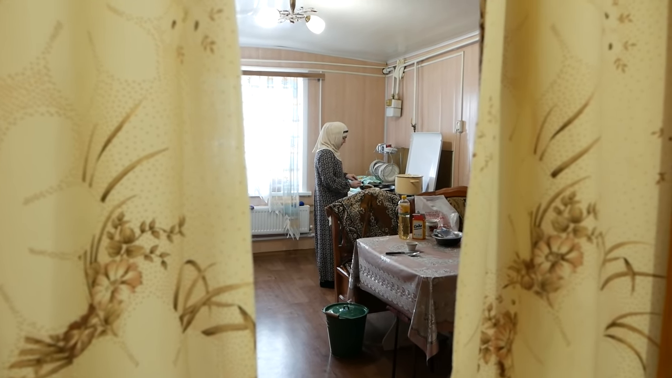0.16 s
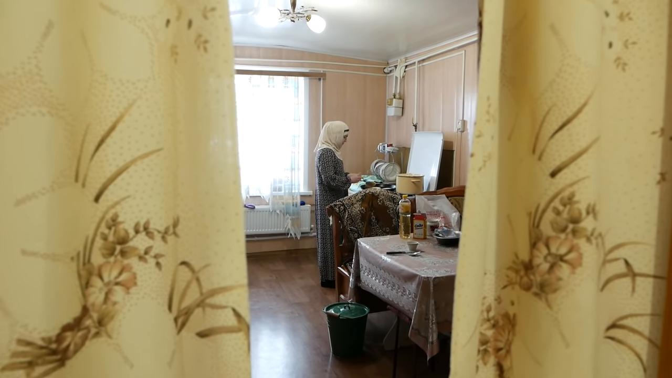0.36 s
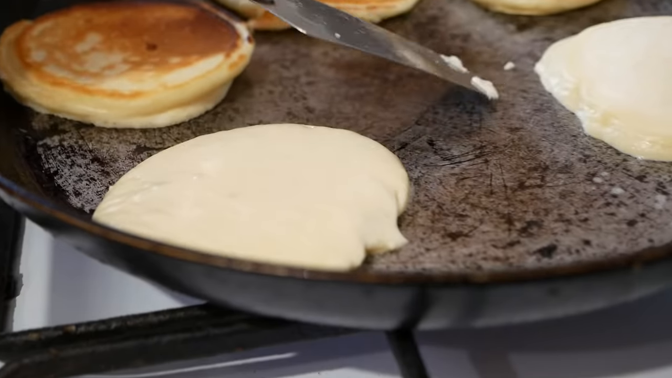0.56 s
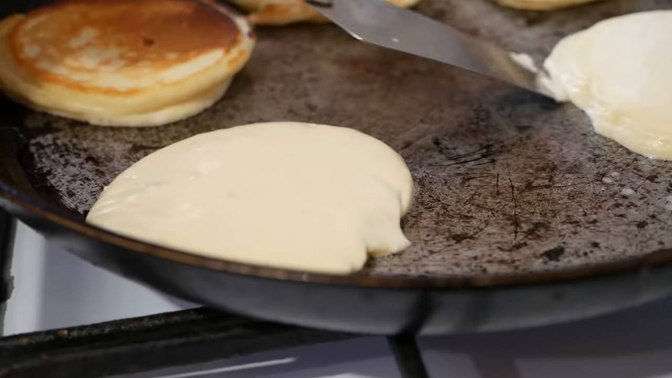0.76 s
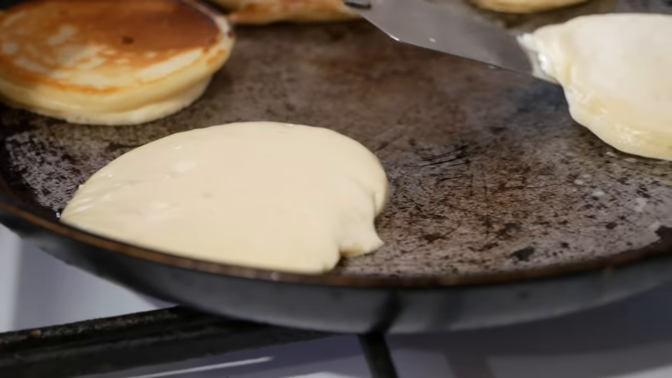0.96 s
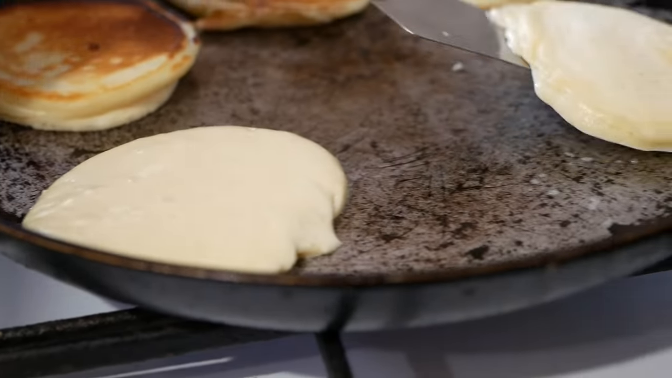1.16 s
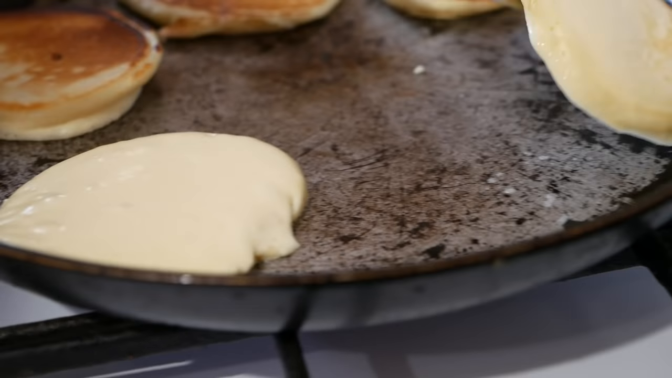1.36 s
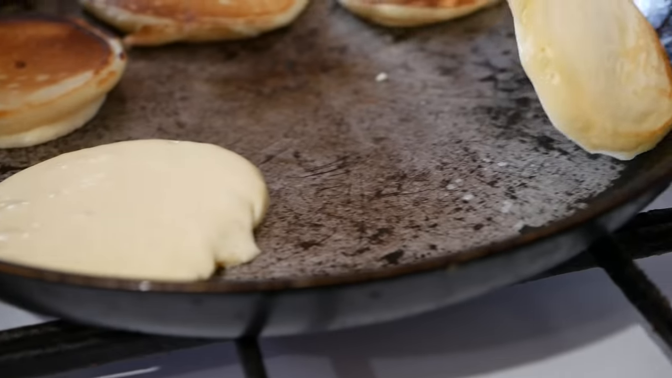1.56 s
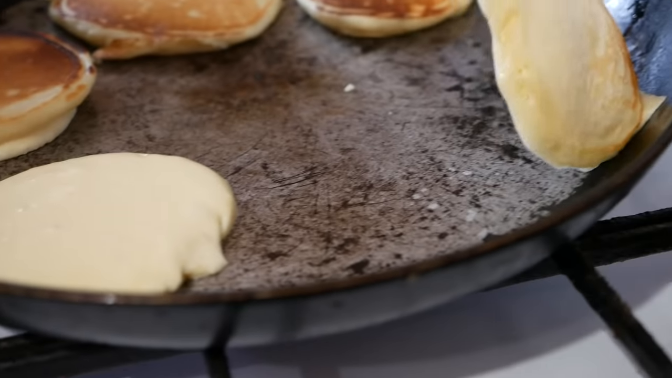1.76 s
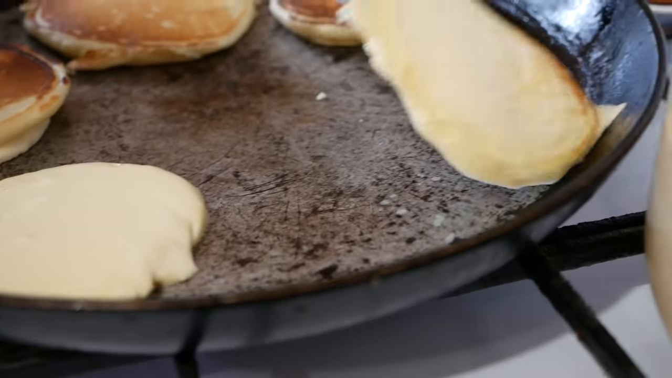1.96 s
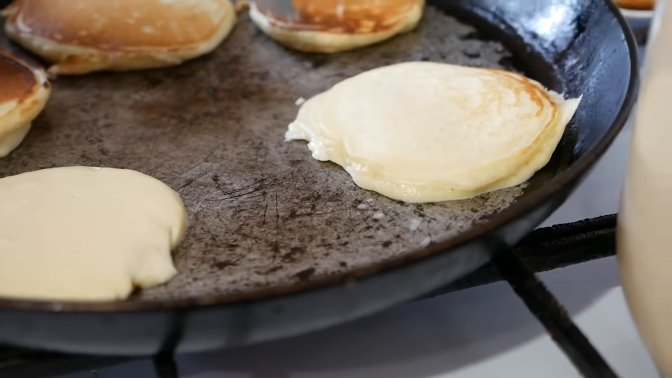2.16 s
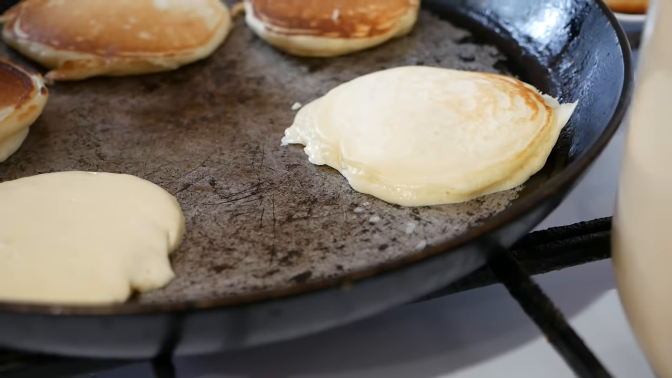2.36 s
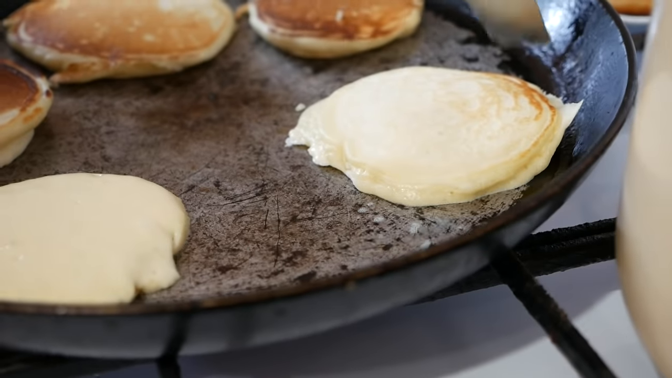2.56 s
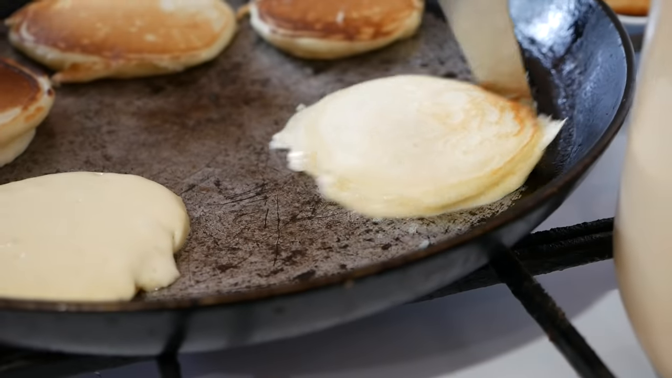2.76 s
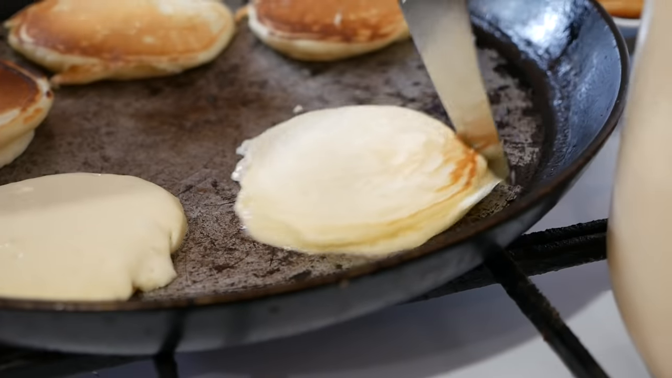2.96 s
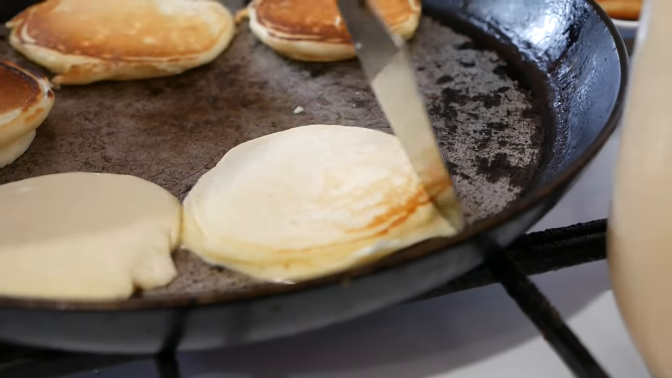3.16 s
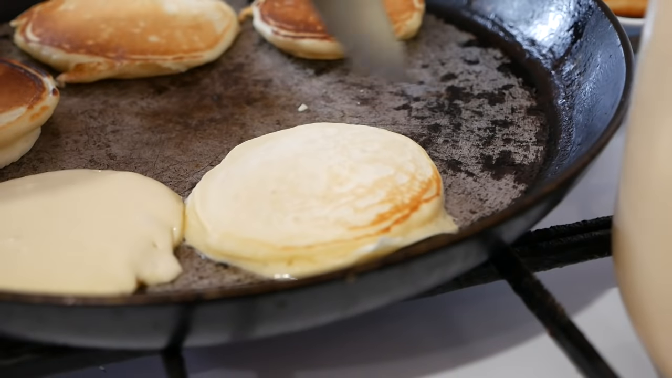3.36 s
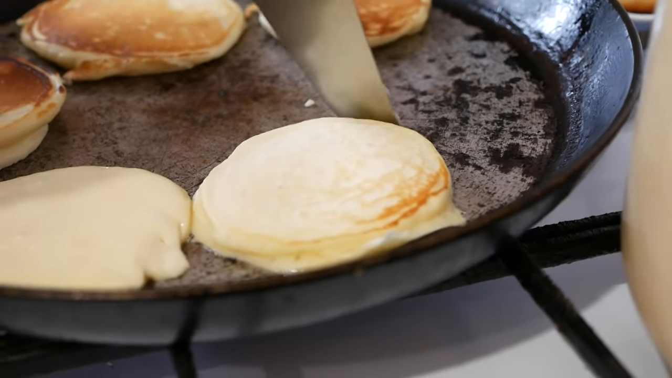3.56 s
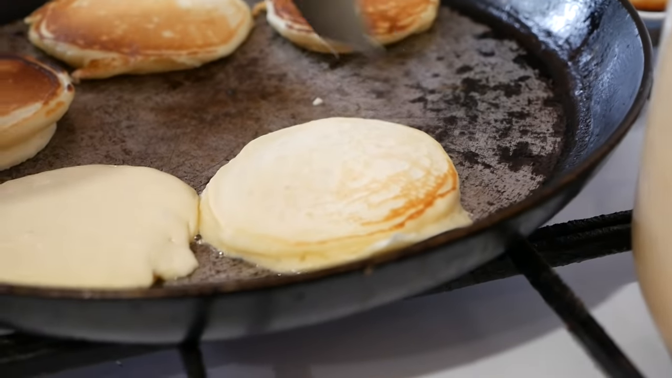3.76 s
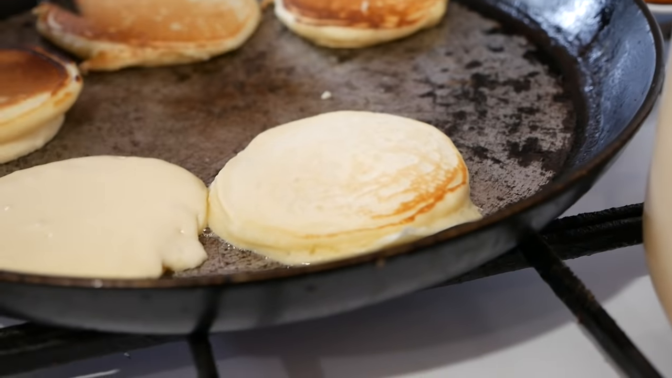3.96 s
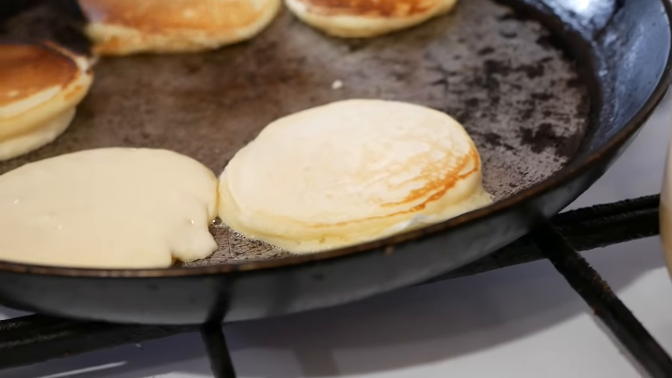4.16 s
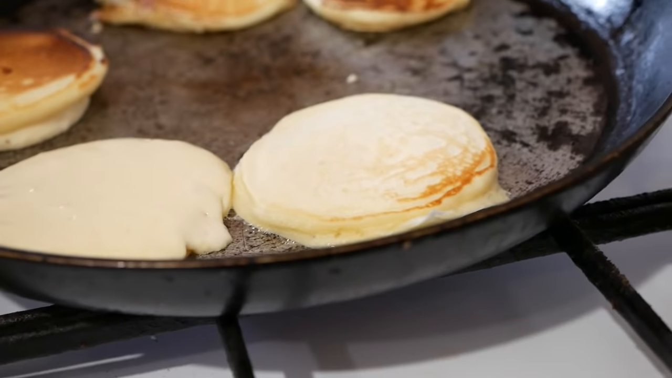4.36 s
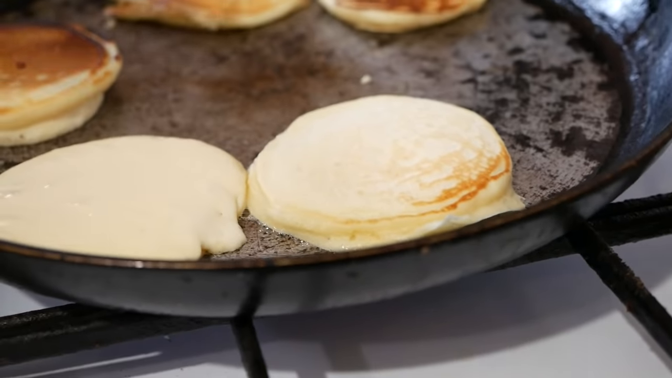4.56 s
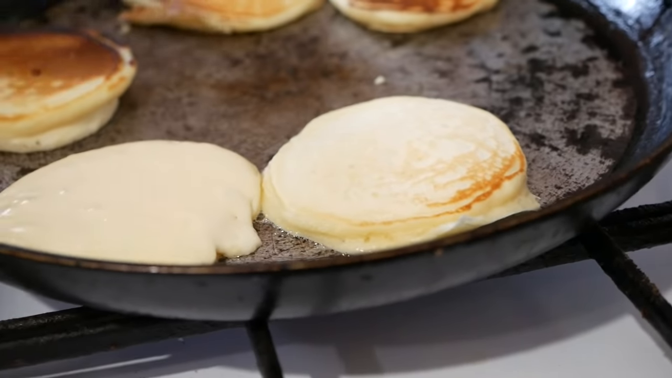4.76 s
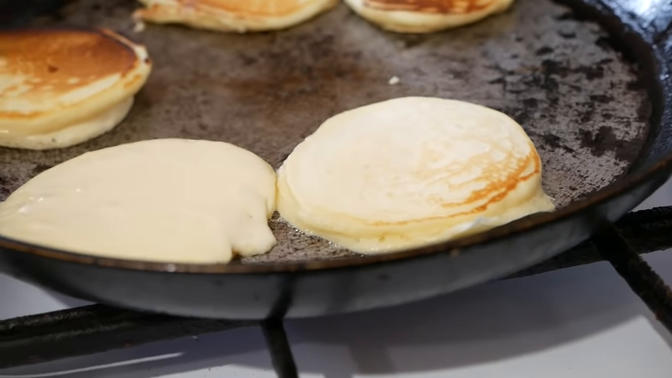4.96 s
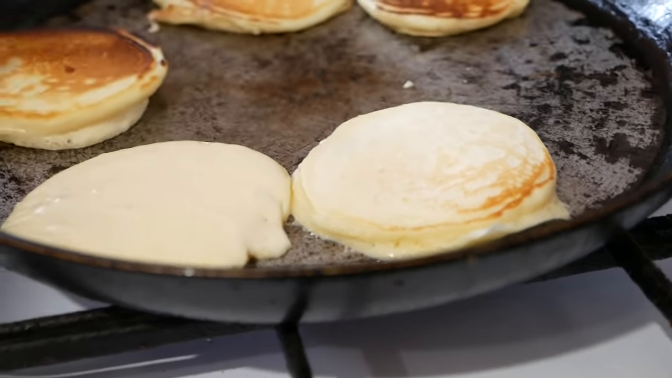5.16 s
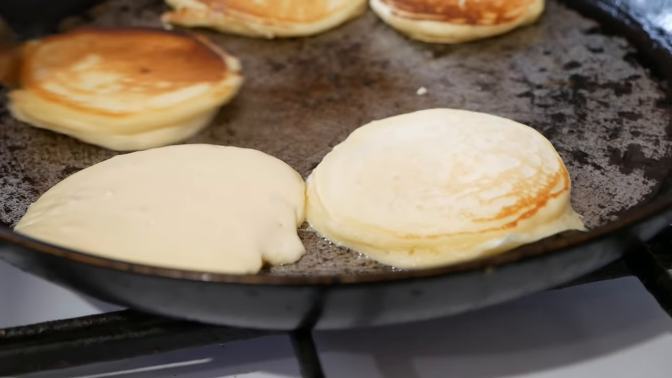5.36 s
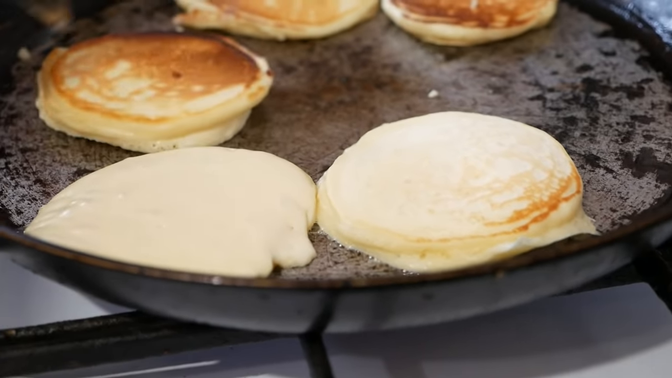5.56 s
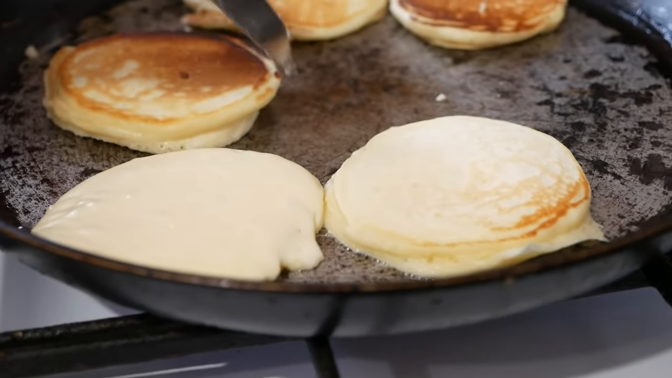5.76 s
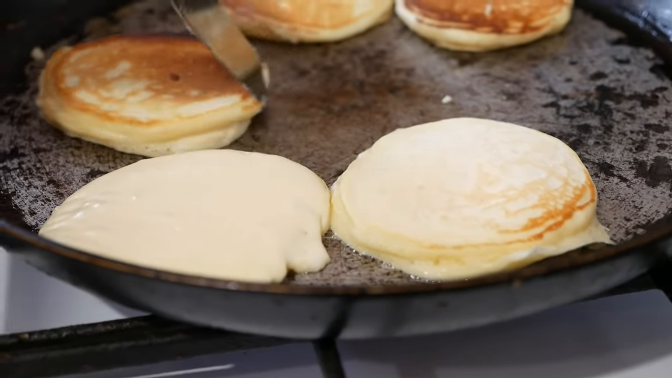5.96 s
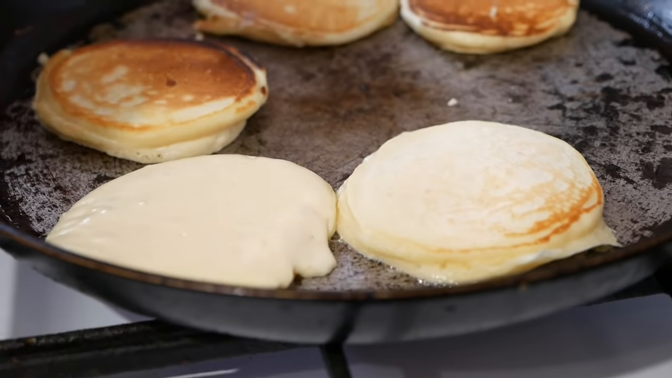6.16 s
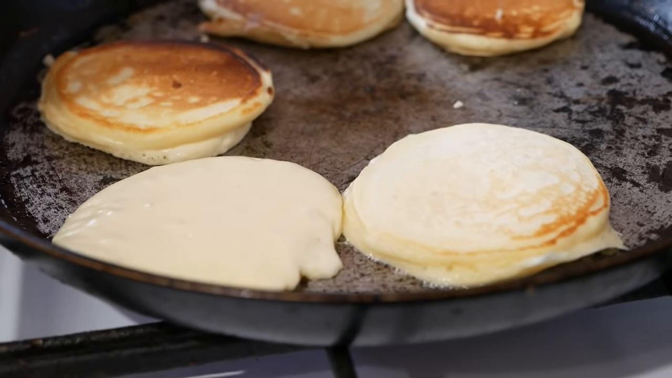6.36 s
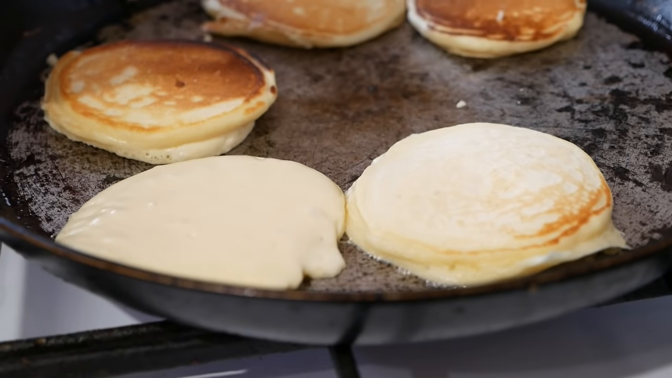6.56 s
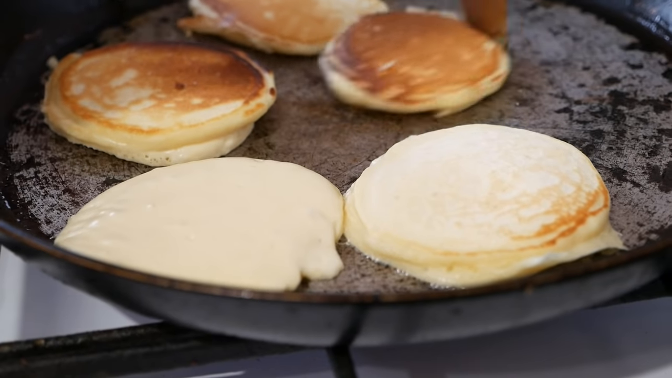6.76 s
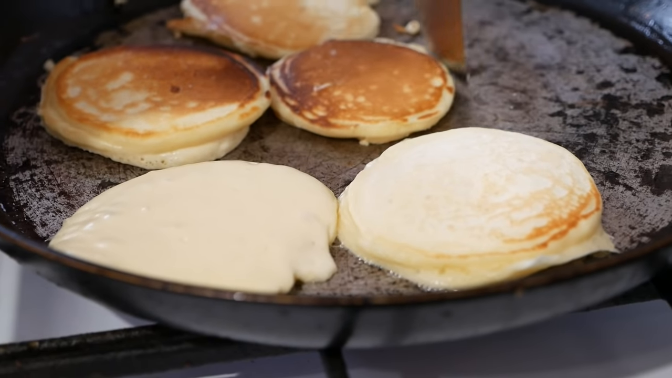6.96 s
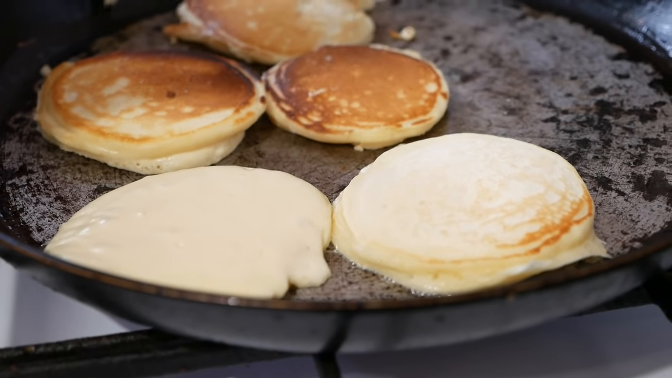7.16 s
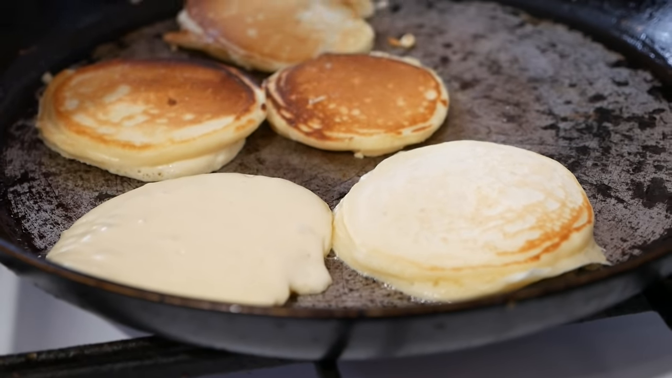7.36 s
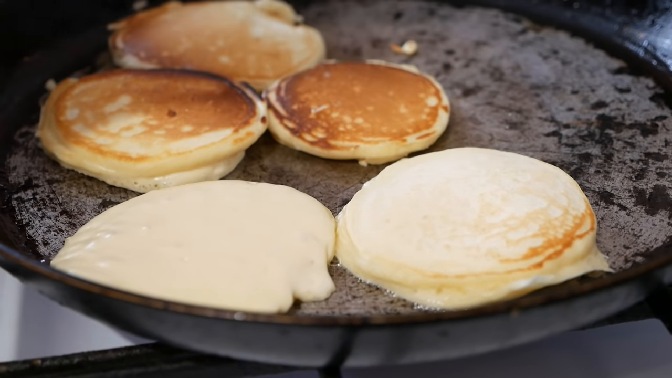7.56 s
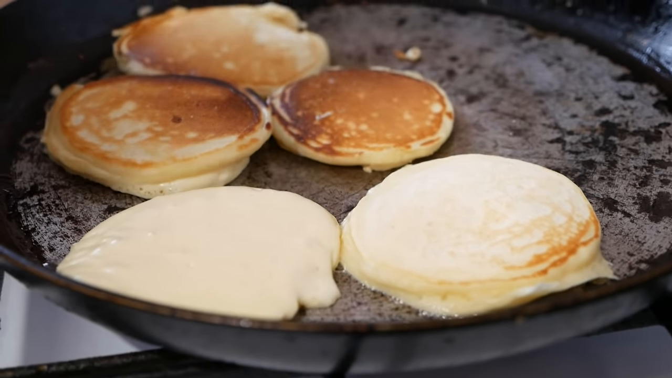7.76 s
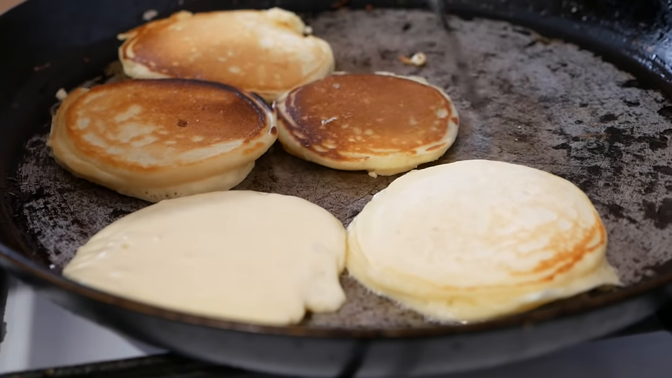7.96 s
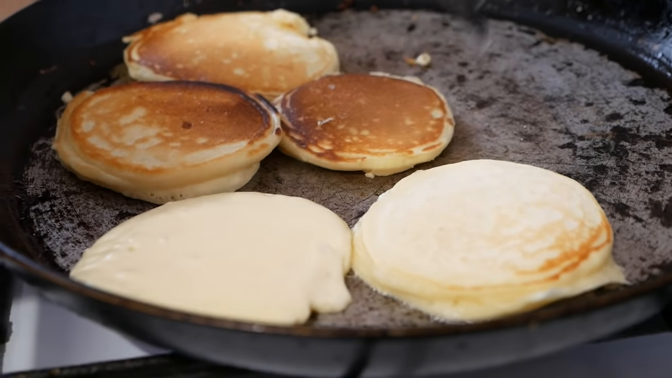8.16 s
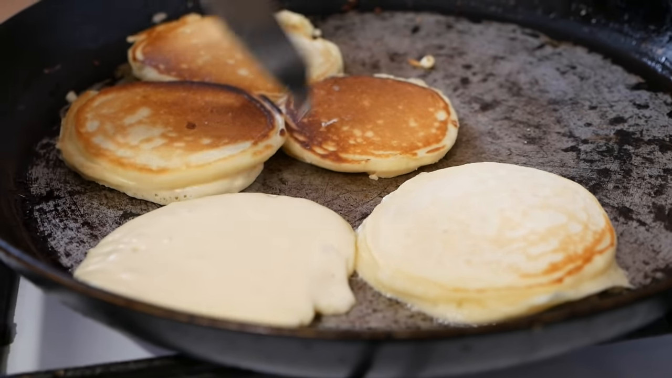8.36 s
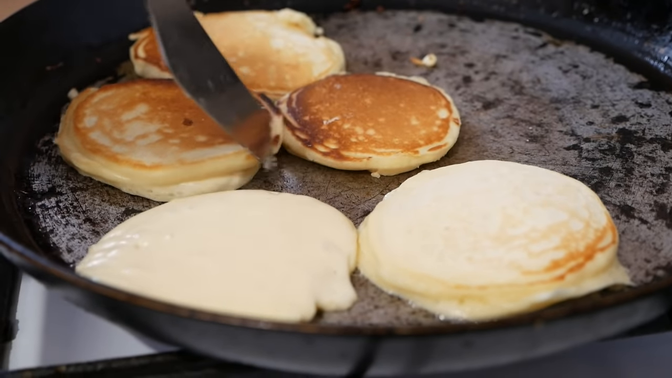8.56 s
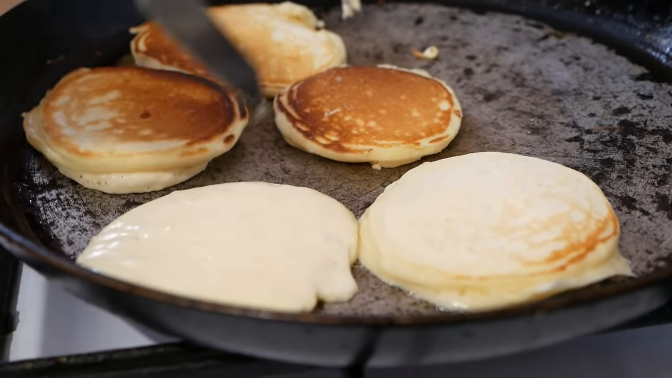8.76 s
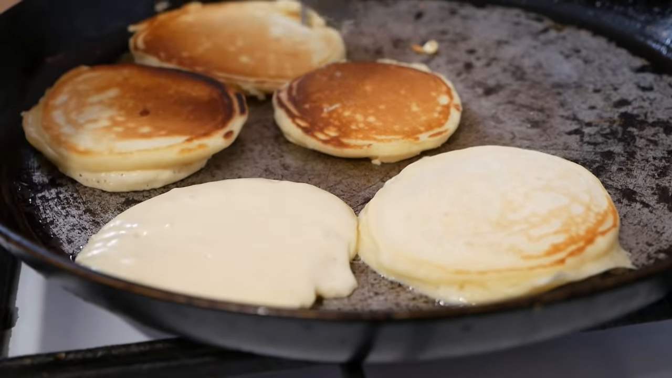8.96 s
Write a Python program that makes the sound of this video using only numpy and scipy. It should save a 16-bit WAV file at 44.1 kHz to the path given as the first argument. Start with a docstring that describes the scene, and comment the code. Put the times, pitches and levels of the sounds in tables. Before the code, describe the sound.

Oil fizzes and spits gently around pancakes, heard from right beside the pan in a home kitchen, over a faint gas flame and a low motor hum. Light blade scrapes and dull stove knocks come first, then the wet slap of a flipped pancake. A sharp clink of knife on iron follows, then a stretch of only sizzling, and finally a few more sharp taps with brief scrapes.

```python
"""A kitchen, pancakes frying in an iron pan on a gas stove. The stereo microphone starts in the doorway
and is beside the rim within half a second. Tiny bubbles fizz in the oil, drops burst in it, and one
pancake lands with a wet slap and a soft thud. A knife taps and scrapes the pan, ringing its modes;
dull knocks shake the stove and a dish rings faintly. Behind them gas jets whistle in the burner,
a motor hums and a draught moves over the microphone."""
import sys
import numpy as np
from scipy import signal
from scipy.fft import rfft, irfft
from scipy.io import wavfile
from scipy.ndimage import uniform_filter1d

SR = 44100
rng = np.random.default_rng(int(sys.argv[2]) if len(sys.argv) > 2 else 0)


def dump(signal):
    """Clip the signal to [-1, 1] and save it as 16-bit WAV at the path in sys.argv[1]."""
    limited = np.clip(np.atleast_2d(signal).T, -1, 1)
    pcm = np.round(limited * 32767).astype(np.int16)
    wavfile.write(sys.argv[1], SR, pcm)


N = 397782
SCATTER_DB = 1.5  # each blow wakes the modes in a slightly different mix


def oil(fizz_db):
    """Tiny bubbles of uneven size fizz; bursting drops and a pancake's wet slap make sharp clicks."""
    # spectrum of the fizz: (frequency [Hz], density [dB])
    fizz_spectrum = [(2200, -6), (3240, -7.5), (4040, -7), (5660, -11.5), (7500, -6.5), (10000, 0.5),
                     (13500, -6), (16000, -7.5)]
    # sharp clicks in the pan, drops bursting in the oil and, loudest, the wet slap of a pancake landing:
    # (time [s], level [dB], pitch [Hz])
    clicks = [(0.5276,-25,10100),(0.641,-25,8800),(0.6615,-22.5,10300),(0.7458,-25.6,10100),(1.069,-23,9400),(1.2285,-23,10500),(1.475,-29,9900),(1.4926,-21,10400),
              (1.692,-24.5,10200),(1.7784,-30,9900),(1.855,-29,10600),(1.99,-26,12200),(2.2637,-9.5,8950),(2.4107,-23,10500),(2.5102,-23.5,10300),(2.6618,-28,10000),
              (2.9878,-21.5,11300),(3.6599,-29,10500),(3.87,-22.5,9800),(4.0622,-20.5,9500),(4.7155,-27.5,8900),(4.7738,-24,12100),(4.826,-27.2,8800),(5.5397,-18,10600),
              (6.1331,-27.6,10800),(7.0774,-21,9750),(7.0803,-16,10700),(7.381,-20.5,10300),(7.539,-15,10900),(8.234,-20,9400),(8.296,-22.5,9100)]
    bubbles = undb(2 * rng.exponential(size=N))
    fizz = wide(lambda hz: undb(curve(fizz_spectrum, hz)) * (hz > 2000), bubbles)
    # patches of oil flare up on their own, each in its own range of pitch
    edges_hz = [0, 5000, 8000, 11000, SR]
    patches = [[shaped(channel, lambda hz: (hz >= lo) * (hz < hi)) for channel in fizz]
               * undb(.5 * walk(6)) for lo, hi in zip(edges_hz, edges_hz[1:])]
    out = sum(patches) * undb(fizz_db + walk(13) + 1.15 * walk(71))
    when, size, pitch = rng.random((200, 3)).T
    small_db = np.minimum(-39 - 2.2 * np.log(size), -32)
    small_spits = np.c_[.46 + when * (N / SR - .5), small_db, 7000 + 5500 * pitch]
    t = np.arange(600) / SR
    spray_band = signal.butter(2, [7000, 12000], "band", fs=SR, output="sos")
    for s, db, hz in np.vstack([clicks, small_spits]):
        pop = t * np.exp(-t / .000055) * np.cos(2 * np.pi * hz * t)
        splash = .19 * np.exp(-t / .0061) * signal.sosfilt(spray_band, rng.standard_normal((2, len(t))))
        add(out, s, pop / np.abs(pop).max() + splash, db, pan_db=-1.2)
    return out


def knife():
    """The blade strikes and rubs the iron; both ring the same modes."""
    # modes of pan and knife: (frequency [Hz], level [dB], t60 [s])
    pan_modes = [(632, -5, 0.098), (800, -3, 0.054), (860, -8, 0.08), (1080, -12, 0.1), (1190, -10, 0.096),
                 (1300, -5, 0.06), (1540, -10.5, 0.07), (2060, -10, 0.05), (2220, -6, 0.057),
                 (2865, -2, 0.05), (3170, -6, 0.025), (3360, -5, 0.05), (4190, -13, 0.065),
                 (5080, -12, 0.047), (5990, -9, 0.052), (7600, -9, 0.04), (7815, -3, 0.05),
                 (7970, -10, 0.05), (8880, -6, 0.04), (9550, -13, 0.05), (9780, -9, 0.04),
                 (10800, -7, 0.04), (11800, -5, 0.025)]
    # knife on iron: (time [s], level [dB], tone at 700 Hz [dB], at 1.3 kHz [dB], at 7.8 kHz [dB],
    # tilt above 2.8 kHz [dB/octave])
    taps = [(0.404, -34, 13, 3, -8, 0.5), (0.75, -17.5, -0.5, 5.5, 2, 5), (3.277, -26.5, 27, 19, 0, 1),
            (3.328, -37, 26, 14, 0, -1), (3.6, -1, 1.5, 7, 3, 2.5), (3.728, -28, 1, -1, -2, -1),
            (6.823, -9, -5.5, 8.5, 3.5, 0.5), (7.475, -0.5, -10.5, -2, -2, -0.5),
            (8.078, 3, 2, 10.5, 3.5, 3), (8.996, -11.5, 4, -13, -8, 0.5)]
    return knife_taps(pan_modes, taps) + knife_scrapes(pan_modes, taps)


def knife_taps(pan_modes, taps):
    """Each tap rings the pan in its own tone; the thick iron radiates little bass."""
    out = np.zeros((2, N))
    for s, db, low_db, mid_db, zing_db, tilt_db in taps:
        tone = [(350, low_db - 13.5), (700, low_db), (1300, mid_db), (2800, 4), (5200, 2),
                (7800, zing_db), (9600, 2), (16000, -4.5)]
        colour_db = lambda hz: curve(tone, hz) + tilt_db * octaves_above(hz, 2800)
        mid, side = (blow(ring(pan_modes, colour_db, SCATTER_DB, dense_db=2, dense_t60=.058), .0015)
                     for _ in range(2))
        add(out, s, spread(mid, side, side_db=-4.5, corner_hz=6000), db, pan_db=-1.5)
    return out


def knife_scrapes(pan_modes, taps):
    """Dense, uneven slips feed the pan as the blade drags, and as it shivers after each tap."""
    # blade dragged over the iron: (start [s], length [s], level [dB], low share [dB], treble share [dB])
    strokes = [(0.412, 0.021, -46.5, -22, -2.5), (0.783, .14, -62, -13, -9), (0.957, 0.058, -45, 5, -4),
               (1.016, 0.085, -51, 6, -1), (1.111, 0.022, -47.5, 7.5, -4), (1.261, 0.052, -50.5, 4, 3.5),
               (1.298, 0.023, -43.5, 9.5, -3), (3.638, 0.056, -43.5, -3, -5), (3.696, 0.028, -44, 2.5, 0),
               (6.711, 0.068, -54.5, -5, 6.5), (6.766, 0.065, -49, -13, 2.5),
               (6.83, 0.048, -33.5, -17, -5.5), (6.889, 0.028, -32.5, -4, -6),
               (6.919, 0.044, -34, -8, -4.5), (6.973, 0.079, -40, 0.5, -4), (7.516, 0.063, -52.5, -10, 0),
               (7.586, 0.061, -54.5, -13, 0.5), (8.102, 0.027, -34, -14, -4.5),
               (8.133, 0.018, -27, -4.5, -4.5), (8.18, 0.05, -56, -13, -8)]
    # the resting blade damps the high modes; each spot it wanders over wakes its own mix of them
    damping = np.minimum(3500 / np.array(pan_modes)[:, 0], 1)
    spots = [ring(pan_modes, scatter_db=3.5, t60_scale=damping, dense_db=16.5, dense_t60=.0098)
             for _ in range(5)]
    shares = np.array([undb(10 * walk(16)) for _ in spots])
    shares /= np.sqrt((shares ** 2).sum(axis=0))
    rubs = []  # mid and side
    for _ in range(2):
        slips = rng.standard_normal(N) * undb(2.96 * rng.exponential(size=N) + 2.2 * walk(120))
        rubs.append(sum(signal.oaconvolve(slips * share, spot[:SR // 5])[:N]
                        for share, spot in zip(shares, spots)))
    # both gain two columns: (rise [s], fall [dB/s])
    drags = [(*stroke, .016, 600) for stroke in strokes]
    shivers = [(s, 0, db - 27, min(low_db, 6), -15, .008, 463) for s, db, low_db, *_ in taps]
    t = np.arange(N) / SR
    bands_hz = [(570, 1000), (1000, 4500), (4500, SR)]
    band_power = np.zeros((3, N))
    for s, length, db, low_db, treble_db, rise_s, fall_db in drags + shivers:
        envelope = np.clip((t - s) / rise_s, 0, 1) * undb(db - fall_db * np.maximum(t - s - length, 0))
        band_power += (envelope * undb([[low_db], [0], [treble_db]])) ** 2
    out = np.zeros((2, N))
    for (lo, hi), power in zip(bands_hz, band_power):
        band = lambda hz: (hz > lo) * (hz <= hi) * undb(octaves_above(hz, 4500))  # top: +1 dB/octave
        mid, side = (unit(shaped(rub, band)) for rub in rubs)
        out += np.sqrt(power) * spread(mid, side, side_db=-11, corner_hz=3000)
    return out * undb([[-.7], [.7]])


def knocks_and_flop():
    """Dull knocks on the stove and the soft thud of a pancake flopping into the pan ring low modes."""
    # modes of the stove: (frequency [Hz], level [dB], t60 [s])
    stove_modes = [(97.3, -13, 0.58), (211, 1.5, 0.11), (329, 0, 0.081), (652, -2, 0.11),
                   (800, -16.5, 0.018), (1020, 13.5, 0.0055), (1560, 12, 0.01)]
    # knocks on the stove and, last, the pancake's flop:
    # (time [s], level [dB], dull above [Hz], slope [dB/octave], contact [s])
    thuds = [(0.601, -37.5, 90, -12, 0.014), (0.962, -13.5, 300, -0.5, 0.0095),
             (1.097, -19, 300, -0.5, 0.017), (1.2, -35, 90, -10, 0.01), (2.2606, -21, 660, -14, 0.00075)]
    out = np.zeros((2, N))
    for s, db, dull_hz, slope_db, contact_s in thuds:
        def colour_db(hz):
            bass_cut = 10 * np.log2(np.clip(hz / 90, .01, 1))
            treble_cut = -8 * np.minimum(hz / 4000, 2.5) ** 2
            return slope_db * octaves_above(hz, dull_hz) + bass_cut + treble_cut
        bodies = (ring(stove_modes, colour_db, SCATTER_DB, dense_db=11.5, dense_t60=.068)
                  for _ in range(2))
        mid, side = (blow(body, contact_s) for body in bodies)
        add(out, s, spread(mid, side, side_db=-13.5, corner_hz=30), db, pan_db=-3)
    return out


def hollow_drone():
    """One low mode sounds with a soft onset and dies away, mostly just after a tap."""
    # the hollow mode: (frequency [Hz], level [dB], t60 [s])
    drone_mode = [(196, -9, 0.47)]
    # its onsets: (time [s], gain [dB])
    onsets = [(6.188, -38), (7.495, -25.5), (8.09, -37.5)]
    out = np.zeros((2, N))
    for s, db in onsets:
        drone = ring(drone_mode)
        fade_in = np.minimum(np.arange(len(drone)) / SR / .007, 1)
        add(out, s, drone * fade_in, db, pan_db=-3)
    return out


def dish():
    """A dish is set ringing once, faintly."""
    # modes of the dish: (frequency [Hz], level [dB], t60 [s])
    dish_modes = [(850, -0.5, 1.4), (1230, -10.5, 1.5)]
    out = np.zeros((2, N))
    add(out, 3.285, ring(dish_modes), db=-46.5)
    return out


def burner(burner_db):
    """Gas jets whistle over dull kitchen noise that rises and falls with them."""
    # spectrum of the kitchen noise: (frequency [Hz], density [dB])
    kitchen_spectrum = [(20, 8), (55, -19.5), (150, -5.5), (400, -12), (770, -16), (970, -23),
                        (1780, -14.5), (3000, -47.5)]
    # whistles of the jets: (frequency [Hz], width [Hz], level [dB])
    whistles = [(1804, 250, -3), (607.6, 24, -10.5), (778, 5.6, -14)]
    kitchen = wide(lambda hz: undb(curve(kitchen_spectrum, hz)) * (hz > 20) * (hz < 3000))
    kitchen *= undb(2.5 + walk(5.3))
    return (kitchen + noise_peaks(whistles)) * undb(burner_db + np.array([[-.4], [.4]]))


def draught():
    """Air rumbles over the microphone ports, in opposite phase left and right."""
    # strength of the draught: (time [s], level [dB])
    strength = [(0, -41), (.7, -42), (1.5, -60)]
    rumble = unit(shaped(rng.standard_normal(N), lambda hz: (hz > 12) * peak(hz, 0, width_hz=97) ** 2))
    level_db = np.interp(np.arange(N) / SR, *np.transpose(strength)) + 1.4 * walk(2.9)
    return rumble * undb(level_db) * np.array([[.85], [-1]])


def motor():
    """A motor's hum fills the whole kitchen, as loud in the doorway as at the rim."""
    # bands of the hum: (frequency [Hz], width [Hz], level [dB])
    hum_bands = [(50.4, 20, -58.5), (95.2, 18, -62), (148, 33, -58.5)]
    return noise_peaks(hum_bands)


def room(hits, t60_s=.21):
    """The kitchen answers with a short diffuse tail, 3 ms behind the direct sound."""
    t = np.arange(SR // 2) / SR
    tail = rng.standard_normal((2, len(t))) * decay(t, t60_s) * (t > .003)
    tail /= np.sqrt((tail ** 2).sum(axis=1, keepdims=True))
    return signal.fftconvolve(hits.mean(axis=0, keepdims=True), tail, axes=1)[:, :N]


def levels_at_microphone(move_s=.45, fade_s=.022):
    """Fizz and burner levels in dB: faint from the doorway, full beside the rim."""
    # swell of fizz and burner at the rim: (time [s], gain [dB])
    swell = [(.47, -1.5), (1.1, 4), (1.4, 0.5), (4.3, 0), (4.7, -0.5), (6.7, 0), (9.02, 0)]
    t = np.arange(N) / SR
    close = np.clip((t - move_s) / fade_s + .5, 0, 1)
    swell_db = np.interp(t, *np.transpose(swell))
    flare_db = (t > .278) * np.maximum(16 - 278 * (t - .278), 0)  # one burst carries to the doorway
    fizz_db = (1 - close) * -64 + close * (swell_db - 51) + flare_db
    burner_db = (1 - close) * -68.5 + close * (swell_db - 54)
    return fizz_db, burner_db


def ring(modes, colour_db=lambda hz: 0, scatter_db=0, t60_scale=1, dense_db=-99, dense_t60=.05):
    """Half a second of a struck body: strong modes with a dense thicket of weak ones between them."""
    hz, db, t60 = np.transpose(modes)
    t = np.arange(SR // 2)[:, None] / SR
    hz = hz * (1 + .003 * min(scatter_db, 1) * rng.standard_normal(len(hz)))
    db = db + scatter_db * rng.standard_normal(len(hz))
    strong = (undb(db) * decay(t, t60_scale * t60) * np.sin(2 * np.pi * hz * t)).sum(axis=1)
    thicket = rng.standard_normal(len(t)) * decay(t[:, 0], dense_t60)
    thicket = causal(thicket, lambda f: dense_db - 3.4 * np.log2(np.maximum(f, 500) / 3000))
    return causal(strong + thicket, colour_db)


def blow(body, contact_s):
    """A first touch and a short rattle excite the body; peak 1."""
    t = np.arange(2000) / SR
    force = .11 * rng.standard_normal(len(t)) * np.exp(-t / contact_s)
    force[0] = 1
    x = signal.fftconvolve(force, body)
    return x / np.abs(x).max()


def wide(gain, grain=1):
    """Stereo noise from unrelated mid and side; mid rms 1."""
    # stereo width: (frequency [Hz], side minus mid [dB])
    width = [(60, 7), (110, -11.5), (300, -9), (700, -12.5), (1800, -52), (4400, -7.5), (15000, -2)]
    mid = shaped(grain * rng.standard_normal(N), gain)
    side = shaped(grain * rng.standard_normal(N), lambda hz: gain(hz) * undb(curve(width, hz)))
    return np.array([mid + side, mid - side]) / np.std(mid)


def noise_peaks(bands):
    """Narrow bands of stereo noise, heard as wavering tones."""
    return sum(undb(db) * wide(lambda f: peak(f, hz, width)) for hz, width, db in bands)


def spread(mid, side, side_db, corner_hz):
    """Left and right differ mainly above the corner."""
    side = signal.sosfilt(signal.butter(2, corner_hz, "high", fs=SR, output="sos"), side) * undb(side_db)
    return np.array([mid + side, mid - side])


def causal(x, colour_db):
    """Colour x by a dB function of Hz without sound before the blow (minimum phase)."""
    n = len(x)
    gain = undb(colour_db(np.fft.rfftfreq(n, 1 / SR)) + np.zeros(n // 2 + 1))
    cepstrum = irfft(np.log(gain), n)
    cepstrum[1:n // 2] *= 2
    cepstrum[n // 2 + 1:] = 0
    return irfft(rfft(x) * np.exp(rfft(cepstrum)), n)


def shaped(x, gain):
    """Filter by a gain function of Hz."""
    return irfft(rfft(x) * gain(np.fft.rfftfreq(N, 1 / SR)), N)


def curve(points, hz):
    """Value of (Hz, value) points on a log-frequency axis."""
    freqs, values = np.transpose(points)
    return np.interp(np.log(np.maximum(hz, 1)), np.log(freqs), values)


def walk(rate_hz):
    """Glide between random values; spread near 1."""
    step = int(SR / rate_hz)
    return uniform_filter1d(np.repeat(rng.standard_normal(N // step + 1), step), step)[:N]


def add(out, s, x, db, pan_db=0):
    """Mix x in at time s; pan_db is left minus right."""
    i = int(s * SR)
    x = x[..., :N - i]
    out[:, i:i + x.shape[-1]] += x * undb(db + np.array([[pan_db], [-pan_db]]) / 2)


def peak(hz, centre_hz, width_hz):
    return 1 / (1 + (2 * (hz - centre_hz) / width_hz) ** 2)


def octaves_above(hz, corner_hz):
    return np.log2(np.maximum(hz / corner_hz, 1))


def decay(t, t60):
    return np.exp(-np.log(1000) * t / t60)


def undb(db):
    return 10 ** (np.asarray(db) / 20)


def unit(x):
    return x / np.sqrt(np.mean(x ** 2))


def scene():
    """Frying and knife in front, the kitchen behind; only the struck and scraped sounds reverberate."""
    fizz_db, burner_db = levels_at_microphone()
    hits = knife() + knocks_and_flop() + hollow_drone() + dish()
    reverb = undb(-10) * room(hits)
    return oil(fizz_db) + hits + reverb + burner(burner_db) + draught() + motor()


def record(dry):
    """Each microphone adds faint hiss, stronger in the lows; the chain rounds peaks and cuts the top."""
    hiss_gain = lambda hz: (hz > 80) / np.maximum(hz, 1) ** .81
    hiss = np.array([unit(shaped(rng.standard_normal(N), hiss_gain)) for _ in dry])
    top_cut = signal.ellip(10, .2, 80, 15850, fs=SR, output="sos")
    return signal.sosfilt(top_cut, np.tanh(dry + undb(-58.5) * hiss))


dry = scene()
out = record(dry)
dump(out)
```